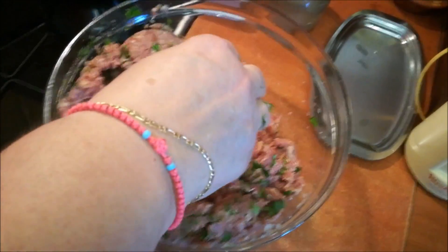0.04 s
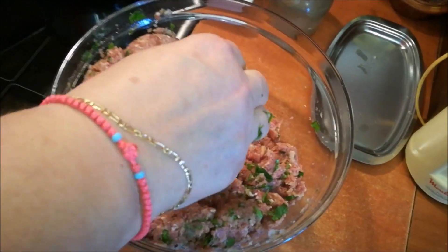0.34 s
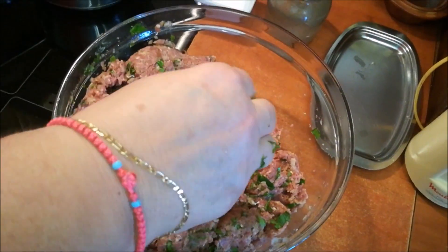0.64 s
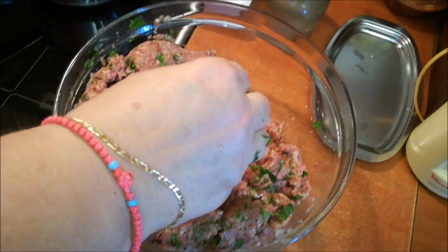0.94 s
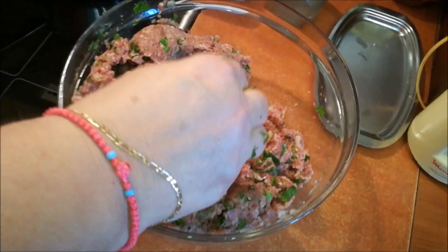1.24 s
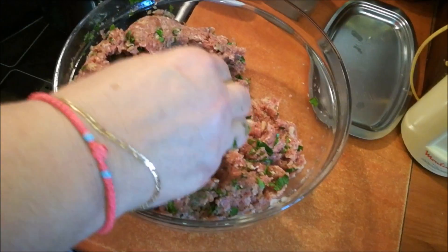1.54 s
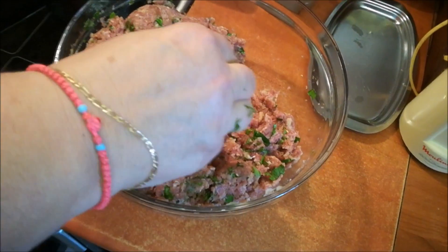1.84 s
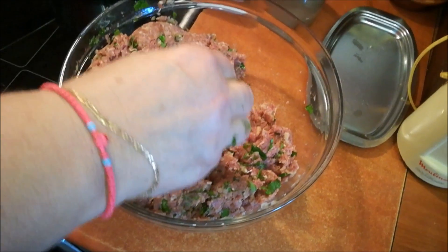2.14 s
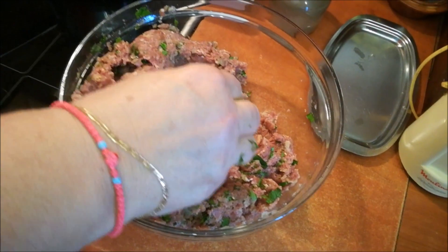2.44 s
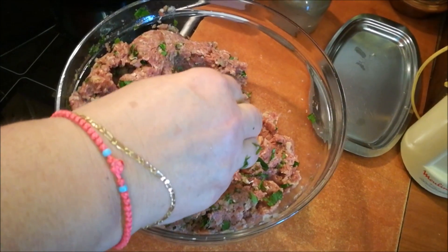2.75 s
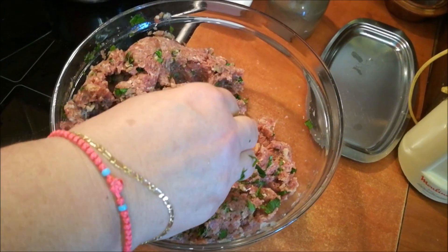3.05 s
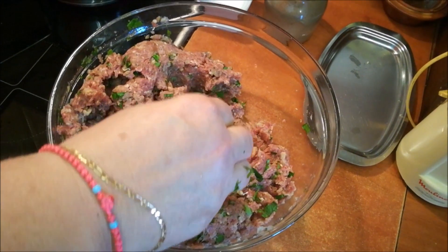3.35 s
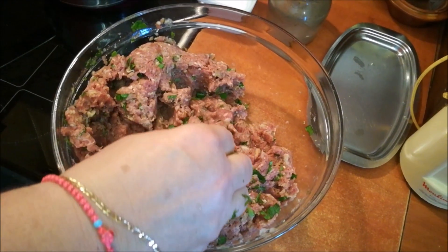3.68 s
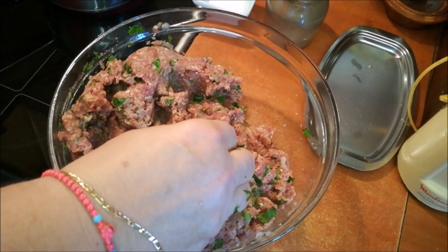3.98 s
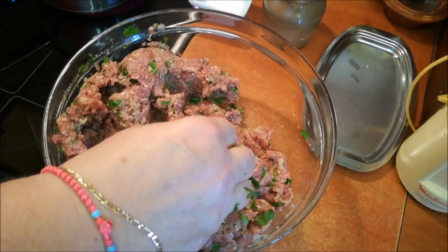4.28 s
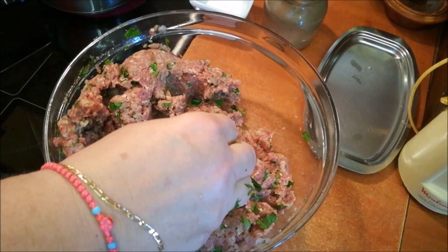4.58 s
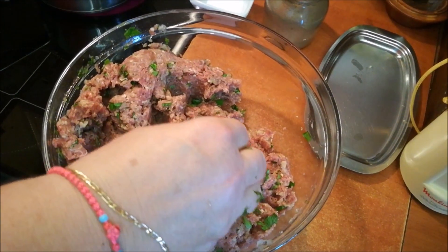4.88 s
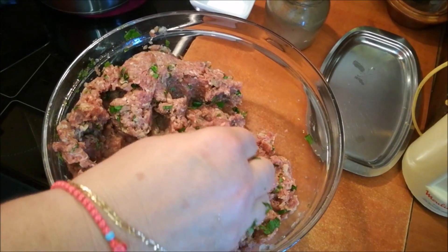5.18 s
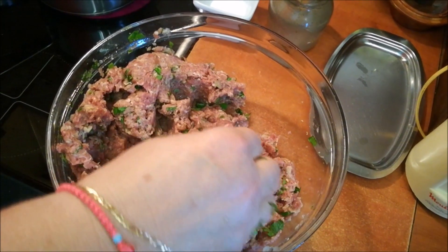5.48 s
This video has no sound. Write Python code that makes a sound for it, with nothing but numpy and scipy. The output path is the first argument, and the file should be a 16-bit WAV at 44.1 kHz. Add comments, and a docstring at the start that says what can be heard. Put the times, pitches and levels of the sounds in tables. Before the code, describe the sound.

A hand kneads minced meat in a glass bowl, close to a small stereo microphone. The meat crackles wetly, air pockets squelch, and the rubbed glass rings faintly in fits while bracelets tick against the rim. Three times the bowl rocks and knocks on the wooden worktop with a low thud, the last time more softly. The kneading carries on to the end in a quiet kitchen.

```python
"""A wet, sticky crackle comes first: a hand kneading minced meat in a glass bowl, close to a small
stereo microphone. Films of meat tear and fizz, air pockets squelch, the rubbed glass sings in fits
and bracelets tick on the rim. Three times the bowl rocks and knocks, and the wooden worktop booms.
Behind it lies a quiet kitchen, where a faint low drone comes and goes twice."""
import sys
import numpy as np
from scipy import signal
from scipy.fft import rfft, irfft
from scipy.io import wavfile
from scipy.ndimage import uniform_filter1d

SR = 44100
rng = np.random.default_rng(int(sys.argv[2]) if len(sys.argv) > 2 else 0)


def dump(signal):
    """Clip the signal to [-1, 1] and save it as 16-bit WAV at the path in sys.argv[1]."""
    limited = np.clip(np.atleast_2d(signal).T, -1, 1)
    pcm = np.round(limited * 32767).astype(np.int16)
    wavfile.write(sys.argv[1], SR, pcm)


N = 252252
TIME = np.arange(N) / SR
FREQS = np.maximum(np.arange(N // 2 + 1) * SR / N, 1)
ECHO_SAMPLES = 2 ** 14


def undb(db):
    """Decibels to gain."""
    return 10 ** (np.asarray(db) / 20)


def unit(x):
    """Scale to rms 1."""
    return x / np.sqrt(np.mean(x ** 2))


def colour(x, points):
    """Shape a sound by (Hz, dB) points."""
    hz, db = np.transpose(points)
    return irfft(rfft(x) * undb(np.interp(np.log(FREQS), np.log(hz), db)), N)


def cut(x, hz, kind, order=2):
    """Low-pass or high-pass."""
    return signal.sosfilt(signal.butter(order, min(hz, SR / 2 - 1000), kind, fs=SR, output="sos"), x)


def resonate(x, hz, width_hz, skirt=2):
    """A resonance, its sides steepened by a second one `skirt` times as wide."""
    for width in (width_hz, skirt * width_hz):
        x = signal.lfilter(*signal.iirpeak(hz, hz / min(width, SR / 4), fs=SR), x)
    return x


def add(out, start, x):
    """Mix a sound in at a start in seconds."""
    i = int(start * SR)
    out[..., i:i + x.shape[-1]] += x[..., :N - i]


def pan(left_over_right_db):
    """Gains for a source nearer one capsule."""
    return undb([[left_over_right_db / 2], [-left_over_right_db / 2]])


def hit(x, db):
    """Scale a blow so that its first 10 ms have this level."""
    return x * undb(db) / np.sqrt(np.mean(x[:, :SR // 100] ** 2))


def decay(t, t60):
    """Fall by 60 dB in t60 seconds."""
    return np.exp(-np.log(1000) * t / t60)


def ring(modes, contact_s=0.0029):
    """Fading partials of a struck body, building up while the contact lasts."""
    t = TIME[:SR // 2]
    partials = sum(undb(db) * decay(t, t60) * np.sin(2 * np.pi * hz * t) for hz, db, t60 in modes)
    return partials * (1 - np.exp(-t / contact_s))


def envelope(start, length, attack_s, release_s):
    """Rise, hold until the length is up, then die away."""
    t = TIME - start
    return np.clip(t / attack_s, 0, 1) * np.exp(-np.maximum(t - length, 0) / release_s)


def gestures(rows, attack_s, release_s):
    """Gain over time for each level column; a new gesture takes over from the fading one."""
    return np.max([undb(db)[:, None] * envelope(start, length, attack_s, release_s)
                   for start, length, *db in rows], axis=0)


def waver(per_s, depth_db):
    """A factor that wanders at random around 1."""
    knots = rng.standard_normal(2000)
    return undb(depth_db * np.interp(TIME * per_s, np.arange(len(knots)), knots))


def grains(count, per_s, spread_db):
    """Random tiny clicks, most of them weak and a few strong."""
    chance, sign = rng.random(count), rng.standard_normal(count)
    size_db = spread_db * np.minimum(rng.exponential(size=count), 4)
    return (chance < per_s / SR) * np.sign(sign) * undb(size_db)


def stereo_noise(size, shared_hz):
    """Noise at two closely spaced capsules: long waves reach both alike."""
    noise = rng.standard_normal((3, size))
    return cut(noise[:2], shared_hz, "high") + cut(noise[2], shared_hz, "low")


def path_to_mic(body, near_db, near_t60, room_db, room_t60=0.42):
    """From one spot in the bowl: direct sound, close echoes off glass and worktop, kitchen tail."""
    t = TIME[:ECHO_SAMPLES]
    near = unit(stereo_noise(ECHO_SAMPLES, shared_hz=860) * decay(t, near_t60))
    room_noise = cut(stereo_noise(ECHO_SAMPLES, shared_hz=442), 9000, "low")
    tail = unit(room_noise * decay(t, room_t60))
    echoes = (undb(near_db) * near + undb(room_db) * tail) / np.sqrt(ECHO_SAMPLES)
    echoes[:, 0] += 1  # direct sound
    spectrum = rfft(echoes)
    # echoes add fine ripple only; the resonances in `body` set the broad colour
    ripple = spectrum / np.sqrt(uniform_filter1d(np.abs(spectrum) ** 2, size=91))
    return irfft(body * ripple) * np.cos(np.pi / 2 * t / t[-1]) ** 2


# Hollow resonances of bowl and microphone housing.
# Each row: centre in Hz, width in Hz, left gain in dB, right gain in dB.
HOLLOW_RESONANCES = [(647, 152, -14.5, -1.5), (702, 78, 11, 2.5), (950, 63, 6, 5), (1252, 360, 5, 2),
                     (1477, 26, 7.5, 4), (1740, 150, -4, 0.5), (1932, 122, 11.5, 0.5), (2258, 330, 7.5, 5),
                     (3000, 200, -7, -1.5), (3400, 400, 0, 3.5), (3920, 110, 1.5, 1), (4800, 2600, 3, 4.5),
                     (7200, 9400, -3, -1)]
def hollow_body():
    """Response of the resonances at each capsule; they ring after a click, never before."""
    freqs = np.arange(ECHO_SAMPLES // 2 + 1) * SR / ECHO_SAMPLES
    db = sum(np.array([[left], [right]]) / (1 + (2 * (freqs - hz) / width) ** 2)
             for hz, width, left, right in HOLLOW_RESONANCES)
    cepstrum = irfft(np.log(undb(db)))[:, :ECHO_SAMPLES // 2]
    cepstrum[:, 1:] *= 2  # minimum phase
    return np.exp(rfft(cepstrum, ECHO_SAMPLES))


# The kitchen all around the microphone. Each row: frequency in Hz, relative level in dB.
ROOM_COLOUR = [(15, -37), (25, 3.5), (93, -1.5), (349, -8.5), (399, -6), (509, -17), (598, -8),
               (871, -12.5), (1270, -6.5), (1710, -10.5), (2010, -28.5), (2230, -8.5), (3530, -11.5),
               (4620, -5), (15500, -20)]
def room_tone():
    """Faint steady noise of the room."""
    return unit(colour(stereo_noise(N, shared_hz=640), ROOM_COLOUR)) * undb(-61.5)


# In the background, alike at both capsules.
# Each row: start in seconds, length in seconds, pitch in Hz, level in dB.
DRONE_SPELLS = [(2.946, 0.746, 82.8, -65), (5.048, 0.58, 87.7, -69)]
def drone():
    """A low tone swells and fades, wavering in pitch and strength."""
    clock = np.cumsum(waver(per_s=84, depth_db=0.5)) / SR
    out = np.zeros(N)
    for start, length, hz, db in DRONE_SPELLS:
        tone = unit(np.sin(2 * np.pi * hz * clock))
        out += tone * undb(db) * envelope(start, length, attack_s=0.23, release_s=0.07)
    return out * waver(per_s=9, depth_db=1.5)


# Modes of the bowl. Each row: frequency in Hz, relative level in dB, seconds to fall 60 dB.
GLASS_MODES = [(718, -4, 0.12), (987, -8, 0.17), (1845, -5, 0.12), (1980, -3.5, 0.27), (2003, 6.5, 0.042),
               (2090, -20, 0.24), (2420, -34, 0.27), (4540, -13, 0.078)]
def glass_ring():
    """Struck glass rings briefly, damped by the meat."""
    return ring(GLASS_MODES)


# Bracelet ticks and small wet snaps, close to the microphone.
# Each row: start in seconds, level in dB, centre in Hz, width in Hz.
LIGHT_CONTACTS = [(0.187, -46, 2570, 2200), (0.244, -40.5, 3880, 3800), (1.141, -46, 3240, 2400),
                  (1.192, -55, 2100, 1500), (1.219, -47.5, 4750, 2400), (1.553, -42.5, 4100, 4150),
                  (1.712, -43.5, 3830, 1980), (1.774, -47.5, 2660, 2000), (2.429, -65, 2020, 400),
                  (2.497, -50, 5800, 1700), (2.638, -47, 3170, 4940), (3.039, -50.5, 5830, 1890),
                  (3.174, -45.5, 3330, 6250), (4.225, -60.5, 11000, 9000), (4.352, -62.5, 11000, 9000),
                  (4.557, -55, 4900, 7000), (4.741, -48, 2900, 3470), (5.618, -50, 2190, 786)]
# A bracelet catches the rim. Each row: start in seconds, gain in dB.
RIM_PINGS = [(0.244, -50), (2.638, -68), (3.174, -43)]
def ticks(body):
    """Single light contacts, each with its own brightness; a few set the rim ringing."""
    out = np.zeros((2, N))
    for start, db, hz, width in LIGHT_CONTACTS:
        click = path_to_mic(body, near_db=17, near_t60=0.05, room_db=14.5)
        snap = cut(resonate(click, hz, width), hz + 2 * width, "low")
        add(out, start, hit(snap, db))
    ping = cut(glass_ring(), 1540, "high", order=4)
    for start, db in RIM_PINGS:
        add(out, start, ping * undb(db))
    return out


# The wood under the bowl. Each row: frequency in Hz, relative level in dB, seconds to fall 60 dB.
WORKTOP_MODES = [(73.1, -14.5, 1), (92.9, -26, 0.93), (116.2, -1, 0.22), (118.2, -12.5, 0.64),
                 (154, -5, 0.31), (176, -25, 0.23), (244, -13.5, 0.2), (304.5, -2, 0.087),
                 (373.5, -9.5, 0.13)]
# Glass on wood at close range. Each row: start in seconds, clack level in dB, treble corner in Hz,
# bass corner in Hz, glass ring gain in dB, worktop boom gain in dB, clack's left over right in dB.
BOWL_KNOCKS = [(1.927, -25, 5030, 198, -45, -35, -1), (1.9300, -33, 4700, 2940, -58, -68, 8),
               (1.932, -26.5, 2590, 260, -48, -59, 2), (2.019, -49.5, 1800, 150, -65, -46, -3),
               (2.133, -46.5, 3050, 200, -68, -48, -2.5), (3.3035, -29, 4100, 885, -23.5, -51, 0),
               (3.321, -22, 5400, 254, -34, -34, 1), (3.3244, -29, 1010, 550, -43, -48, -5),
               (3.3309, -37, 3800, 300, -27.5, -63, 5), (3.3570, -32.5, 8200, 3450, -32.5, -46.5, -0.5),
               (3.3967, -38, 4960, 4120, -61, -65, 2), (4.361, -47, 1370, 200, -80, -50, -1),
               (4.375, -46.5, 2180, 496, -73, -70, 0), (4.4203, -40.5, 1800, 600, -75, -70, -7),
               (4.426, -37, 1780, 300, -68, -30.5, 6), (4.4350, -37, 1370, 400, -70, -39, -2.5),
               (4.448, -35, 3030, 400, -75, -43, 1)]
def knocks(body):
    """The bowl rocks and chatters: each contact clacks, the glass rings and the worktop booms."""
    out = np.zeros((2, N))
    boom, glass = ring(WORKTOP_MODES), glass_ring()
    for start, db, treble_hz, bass_hz, glass_db, boom_db, pan_db in BOWL_KNOCKS:
        click = path_to_mic(body, near_db=12.5, near_t60=0.082, room_db=2)
        clack = cut(cut(click, treble_hz, "low", order=3), bass_hz, "high")
        add(out, start, hit(clack, db) * pan(pan_db))
        add(out, start, glass * undb(glass_db) + boom * undb(boom_db))
    return out


# Squeezed air and sticky finger drags, down in the bowl.
# Each row: start in seconds, length in seconds, level in dB, centre in Hz, width in Hz.
AIR_POCKETS = [(0.07, 0.024, -58, 8060, 1190), (0.077, 0.052, -48.5, 2400, 2630),
               (0.096, 0.048, -55, 1680, 296), (0.336, 0.42, -58, 4700, 650), (0.658, 0.117, -56, 1843, 90),
               (0.803, 0.09, -49, 3340, 2200), (1.022, 0.058, -53, 4340, 1110),
               (1.238, 0.045, -64.5, 420, 200), (1.401, 0.03, -51.5, 794, 1830),
               (1.588, 0.034, -46.5, 3130, 2000), (3.236, 0.08, -58, 734, 250),
               (3.279, 0.015, -41.5, 1730, 1800), (4.288, 0.052, -53, 436, 696),
               (4.357, 0.039, -48, 890, 980), (4.597, 0.026, -54.5, 713, 110),
               (4.633, 0.027, -54, 754, 167), (4.634, 0.015, -49.5, 3300, 700),
               (4.76, 0.032, -51, 2420, 400), (4.764, 0.016, -56.5, 670, 200),
               (4.805, 0.035, -61.5, 750, 200), (4.795, 0.045, -55.5, 4180, 1980),
               (5.079, 0.25, -57.5, 2270, 350), (5.101, 0.1, -58.5, 4950, 1500),
               (5.157, 0.087, -63, 816, 100), (5.298, 0.048, -58, 850, 407), (5.44, 0.1, -57.5, 2280, 300),
               (5.506, 0.035, -60, 3540, 497), (5.629, 0.033, -55.5, 750, 121)]
def squelches(body):
    """A burst of tiny wet pops sputters through a small cavity between meat and glass."""
    out = np.zeros((2, N))
    path = path_to_mic(body, near_db=6.5, near_t60=0.056, room_db=1.0)
    t = TIME[:SR // 2]
    for start, length, db, hz, width in AIR_POCKETS:
        swell = np.sqrt(np.abs(np.sin(np.pi * np.minimum(t / length, 1))))
        sputter = grains(len(t), per_s=3400, spread_db=5.5) * swell
        squelch = signal.fftconvolve(resonate(sputter, hz, width)[None], path, axes=1)
        rms = np.sqrt(np.sum(squelch ** 2) / (2 * length * SR))
        add(out, start, squelch * undb(db) / rms)
    return out


def texture(spots, points, per_s, spread_db):
    """Coloured micro-clicks reaching the microphone from spots around the fingers."""
    clicks = sum(signal.oaconvolve(grains(N, per_s, spread_db)[None], path, axes=1)[:, :N]
                 for path in spots)
    return unit(colour(clicks, points))


# Four colours of the hand in the meat. Each row: frequency in Hz, relative level in dB.
CRACKLE_COLOUR = [(200, -13.5), (700, -11), (1150, -5.5), (1600, -1), (2600, 3), (4500, 0.5), (6200, 1),
                  (7800, -5), (10000, -13.5), (15000, -32)]
FIZZ_COLOUR = [(2000, -6), (5000, 2), (7500, 5.5), (11000, -6), (15500, -13)]
RUB_COLOUR = [(500, -15), (1100, -15.5), (1600, 4), (2300, -9.5), (3000, -8), (6000, -24)]
PUSH_COLOUR = [(20, -8), (60, -16.5), (120, 1), (220, -10), (400, -18.5), (700, -39), (2000, -93)]
# Meat peels off skin and glass. Each row: start in seconds, length in seconds, fizz level in dB.
STICKY_PEELS = [(0.07, 0.019, -47), (0.62, 0.072, -54.5), (0.78, 0.15, -54.5), (1.32, 0.074, -54.5),
                (1.55, 0.14, -53), (1.68, 0.22, -57), (2.05, 0.28, -63.5), (2.615, 0.025, -50.5),
                (3.02, 0.24, -68), (3.55, 0.13, -58), (3.72, 0.033, -63.5), (3.99, 0.029, -61),
                (5.4, 0.057, -61.5)]
# The fist closes, right by the microphone. Each row: start in seconds, length in seconds,
# then levels in dB for the tearing, the bowl's upper ring, its lower ring and the dull push.
FIST_SQUEEZES = [(0.0, 0.084, -60, -70, -73, -65), (0.17, 0.12, -51, -57, -75, -65.5),
                 (0.33, 0.63, -50, -59, -64, -77), (0.99, 0.52, -51.5, -62.5, -66, -66),
                 (1.55, 0.082, -49, -54, -61, -64), (1.73, 0.42, -51.5, -57.5, -62, -65),
                 (2.34, 0.091, -60.5, -58.5, -80, -69), (2.57, 0.065, -62, -53.5, -63, -75),
                 (2.9, 0.33, -65.5, -68, -72, -71.5), (3.16, 0.33, -58, -58.5, -63, -66),
                 (4.59, 0.061, -53, -56.5, -67, -63), (4.73, 0.46, -56, -56.5, -82, -78),
                 (5.22, 0.2, -61, -61, -80, -81), (5.41, 0.13, -53, -58.5, -72, -83),
                 (5.62, 0.069, -60, -55.5, -74, -77)]
def kneading(body):
    """Wet films tear, tiny bubbles fizz, meat rubs the glass into ringing and the hand pushes dully."""
    # the fist closes quickly, the meat relaxes slowly
    tear, upper_rub, lower_rub, weight = gestures(FIST_SQUEEZES, attack_s=0.041, release_s=0.1)
    peel, = gestures(STICKY_PEELS, attack_s=0.022, release_s=0.03)
    # the hand never quite stops
    tear = np.hypot(tear, undb(-65))
    upper_rub = np.hypot(upper_rub, undb(-73))
    weight = np.hypot(weight, undb(-76))
    peel = np.hypot(peel, tear * undb(-22.5))  # tearing fizzes a little too
    spots = [path_to_mic(body, near_db=12.5, near_t60=0.032, room_db=-0.5) for _ in range(3)]
    hand_grip = waver(per_s=60, depth_db=1.45)  # the meat sticks and gives way
    crackle = texture(spots, CRACKLE_COLOUR, per_s=1800, spread_db=3.5) * tear
    fizz = texture(spots[:2], FIZZ_COLOUR, per_s=1300, spread_db=4.5) * peel
    friction = texture(spots[2:], RUB_COLOUR, per_s=1300, spread_db=0.5)
    smear = friction * upper_rub * undb(-7.5)
    wall = unit(resonate(friction[1], hz=1997, width_hz=85, skirt=4))
    upper_ring = wall * upper_rub * pan(5)  # the rubbed wall is nearer the left capsule
    lower_ring = unit(resonate(friction, hz=1280, width_hz=50, skirt=4)) * lower_rub
    push = unit(colour(stereo_noise(N, shared_hz=534), PUSH_COLOUR)) * weight
    glass_grip = waver(per_s=21, depth_db=1.3)  # the glass sings in fits
    return hand_grip * (crackle + fizz + smear) + glass_grip * (upper_ring + lower_ring) + push


def scene():
    """The bowl close up, the kitchen behind; everything reaches the left capsule a little later."""
    body = hollow_body()
    left, right = kneading(body) + squelches(body) + ticks(body) + knocks(body) + room_tone() + drone()
    lag_samples = 20
    return np.array([np.pad(left, (lag_samples, 0))[:N], right])


def record(dry):
    """The microphone chain cuts off steeply above 15.9 kHz."""
    return signal.sosfilt(signal.ellip(10, .1, 70, 15900, fs=SR, output="sos"), dry)


dry = scene()
out = record(dry)
dump(out)
```